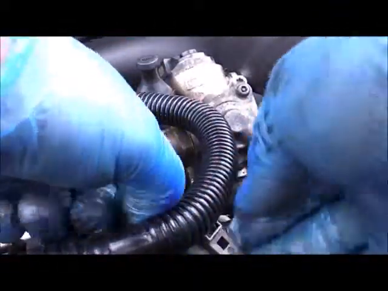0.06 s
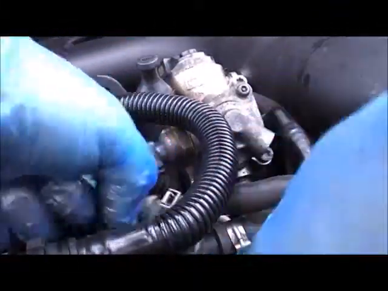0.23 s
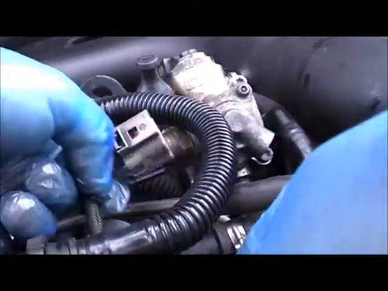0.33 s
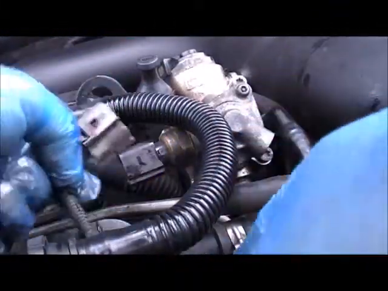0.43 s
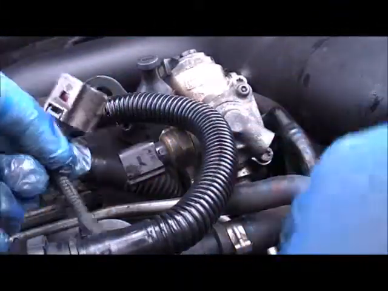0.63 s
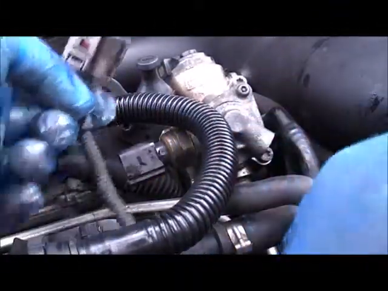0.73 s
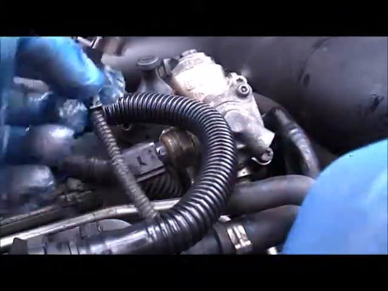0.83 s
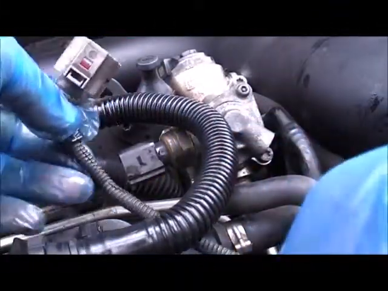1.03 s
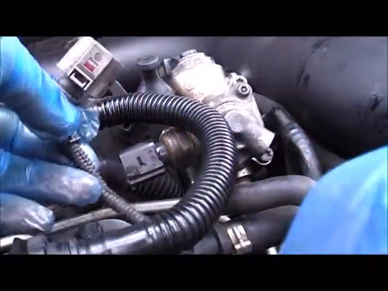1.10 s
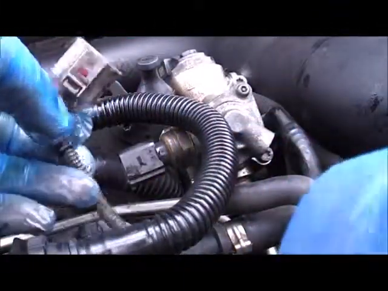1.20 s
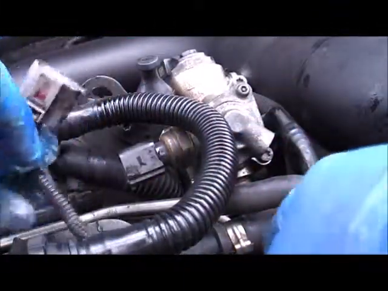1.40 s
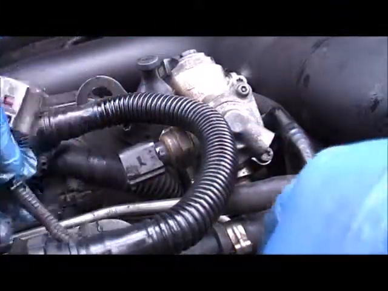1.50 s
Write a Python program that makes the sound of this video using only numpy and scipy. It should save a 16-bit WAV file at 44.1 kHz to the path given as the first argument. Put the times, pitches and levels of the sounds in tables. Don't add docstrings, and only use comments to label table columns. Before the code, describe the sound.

Close, dry glove film hisses and crinkles as hands free a plastic connector: light taps, one strong clattering knock, then a few sharp pops and quieter rustling, with low far traffic behind.

```python
import sys
import numpy as np
from scipy import signal
from scipy.fft import rfft, irfft
from scipy.io import wavfile
from scipy.ndimage import uniform_filter1d

SR = 44100
rng = np.random.default_rng(int(sys.argv[2]) if len(sys.argv) > 2 else 0)


def gain_from_db(level_db):
    decades = np.asarray(level_db, float) / 20
    return 10 ** decades


def output_pcm(signal):
    pcm = np.clip(np.atleast_2d(signal).T, -1, 1) * 32767
    wavfile.write(sys.argv[1], SR, np.round(pcm).astype(np.int16))


N = 68355
MODE_S = 0.08

# start_s, length_s, level_db, whistle_hz, whistle_share_db
GLOVE_STROKES = [(.0, 0.6, -55.5, 6570, -21), (.006, .036, -40, 2930, 0.5),
                 (0.061, 0.052, -56.5, 3580, -20), (0.127, 0.083, -46.5, 6450, -27),
                 (0.21, 0.042, -32, 5460, -8), (0.25, 0.12, -51.5, 2540, -9),
                 (0.373, 0.058, -51.5, 5460, -1), (0.428, 0.055, -51, 3800, -1),
                 (.480, .038, -41, 3800, -2), (.515, .068, -40.5, 6500, -10),
                 (0.626, 0.062, -50.5, 7000, -12), (0.668, .036, -36.5, 4180, -3),
                 (0.72, 0.047, -49, 3740, -12), (0.774, 0.31, -55.5, 6740, -22),
                 (0.813, 0.061, -48, 3660, -15), (0.919, 0.031, -48, 6000, -18),
                 (0.969, 0.011, -43.5, 6500, -20), (1.031, 0.072, -54, 7000, -26),
                 (1.188, 0.5, -57, 6400, -30), (1.22, 0.049, -48, 4500, -20),
                 (1.318, 0.054, -44.5, 3890, -8), (1.399, 0.027, -48.5, 4230, -11),
                 (1.431, 0.064, -64, 4230, -12), (1.531, 0.044, -43.5, 5440, -10)]
# freq_hz, density_db_per_hz
FILM_SPECTRUM = [(880, -62), (1500, -12), (2870, -8.5), (3690, -6), (5020, -5.5), (5950, -3), (7720, -2),
                 (14900, -26), (16300, -67)]
# freq_hz, density_db_per_hz
TRAFFIC_SPECTRUM = [(24, -57), (40, -28), (250, -10.5), (320, -10.5), (1070, 0), (2700, -12.5), (7000, -18),
                    (10700, -28), (16000, -42)]
# time_s, level_db
TRAFFIC_SWELL = [
    (0.0, -47),
    (0.112, -51.5),
    (0.378, -55.5),
    (0.98, -51),
    (1.134, -52.5),
    (1.55, -49.5),
]
# start_s, peak_db, push_s, main_mode_hz
CONNECTOR_KNOCKS = [(.010, -27.5, 0.000065, 1350), (0.0171, -31.5, 0.00007, 1490), (.022, -30, .0001, 2790),
                    (.027, -29.5, 0.000082, 1325), (.038, -28, 0.00037, 886), (.103, -37, 0.00017, 960),
                    (.2188, -10, .0003, 825), (0.2211, -4, .00008, 830), (.2232, -9, 0.000045, 1550),
                    (0.2251, -10.5, 0.00026, 840), (0.2324, -11, 0.000063, 1284),
                    (0.2371, -16.5, 0.000057, 2365), (0.2417, -17, .0001, 2490),
                    (.2455, -17.5, 0.00017, 1344), (0.329, -36.5, .0003, 1350), (.726, -31, 0.00033, 410),
                    (0.7302, -31, .0005, 1065), (.7352, -28, .0005, 1065), (.742, -37, 0.00054, 1070),
                    (.750, -34, 0.00031, 885), (.80, -39, 0.00049, 1210), (1.381, -35, .0004, 1107)]
# freq_hz, level_db, t60_s
CONNECTOR_MODES = [(563, -18, 0.034), (842, -6.5, 0.021), (1057, -8, 0.033), (1203, -8.5, 0.027),
                   (1323, -5, 0.035), (1587, -4, 0.038), (2049, -7.5, 0.037), (2406, -6, 0.037),
                   (2705, -6, 0.028), (3180, -12, .015)]
# start_s, peak_db, ring_hz, ring_t60_s
CREASE_SNAPS = [(.0865, -25.5, 7270, 0.0035), (.200, -41, 6000, .005), (.2212, -4.5, 7240, 0.003),
                (.2232, -7.5, 7130, 0.0066), (.2328, -11.5, 7320, 0.013), (.2372, -7, 6900, 0.0051),
                (.2418, -13, 6500, 0.0064), (.2502, -20.5, 8100, 0.0053), (.2897, -30, 2550, 0.0089),
                (.391, -23.5, 6700, 0.0034), (.5385, -4.5, 5920, 0.0052), (.541, -19, 4560, 0.017),
                (.572, -26, 6400, 0.0056), (.6647, -11, 7150, 0.0078), (.752, -42, 7900, 0.004),
                (.830, -33, 6800, .005), (.948, -5, 6700, .004), (.9495, -18, 7460, 0.0051),
                (.9532, -14, 8400, 0.007), (.955, -11.5, 6820, 0.0043), (.9697, -6, 7340, 0.0028),
                (1.407, -33, 7500, .005)]
# ratio, level_db
PATCH_PARTIALS = [(.42, -18), (.58, -11.5), (.8, -8), (1.0, 5), (1.179, -2.5), (1.48, -5.5), (2.0, -20)]


def colour(x, table):
    freq_hz = np.fft.rfftfreq(N, 1 / SR)
    points = np.array(table)
    db = np.interp(np.log(freq_hz + 1), np.log(points[:, 0]), points[:, 1])
    db = db - 12 * np.clip(np.log2(points[0, 0] / (freq_hz + 1)), 0, 9)
    y = irfft(rfft(x) * gain_from_db(db), N)
    return y / np.std(y)


def band(x, hz, width_hz):
    return signal.lfilter(*signal.iirpeak(min(hz, SR * 0.45), hz / width_hz, fs=SR), x)


def above(x, hz):
    return signal.sosfilt(signal.butter(4, hz, "high", fs=SR, output="sos"), x)


def walk(rate_hz):
    hold = int(SR / rate_hz)
    steps = np.repeat(rng.standard_normal(N // hold + 1), hold)
    return 0.87 * uniform_filter1d(uniform_filter1d(steps, hold), hold)[:N]


def add(out, x, start_s):
    i = max(int(start_s * SR), 0)
    out[i:i + len(x)] += x[:N - i]


def ring(hz, t60_s, phase):
    t = np.arange(int(SR * MODE_S)) / SR
    return np.sin(2 * np.pi * hz * t + phase) * gain_from_db(-60 * t / max(t60_s, 1e-3))


def echo(x, t60_s):
    t = np.arange(SR // 8) / SR
    tail = rng.standard_normal(len(t)) * gain_from_db(-60 * t / t60_s)
    tail = tail / np.sqrt(np.sum(tail ** 2))
    return signal.fftconvolve(x, tail)[:N]


def film_strokes():
    grains_per_s, grain_spread_db, patchy_db, creep_db = 14000, 1.74, 2, -71
    attack_s, release_s, whistle_width, fold_q = 0.0066, 0.022, 0.082, 9
    slips = rng.standard_normal(N) * (rng.random(N) < grains_per_s / SR)
    slips = slips * gain_from_db(grain_spread_db * rng.exponential(size=N))

    folds = np.zeros(N)
    for k, hz in enumerate(1500 * 1.13 ** np.arange(20)):
        folds += (-1) ** k * gain_from_db(1.63 * patchy_db * walk(90)) * band(slips, hz, hz / fold_q)
    film = colour(folds + 0.12 * slips, FILM_SPECTRUM)
    rough = slips / np.std(slips) * gain_from_db(patchy_db * walk(170))

    out = gain_from_db(creep_db + 2 * walk(14.1)) * film
    for start_s, length_s, level_db, hz, share_db in GLOVE_STROKES:
        i = int(start_s * SR)
        here = slice(i, min(i + int((length_s + release_s) * SR), N))
        t = np.arange(here.stop - i) / SR
        env = np.minimum(t / attack_s, (length_s - t) / release_s + 0.56)
        env = np.clip(env, 0, 1) ** 1.27
        width_hz = hz * whistle_width
        whistle = band(band(rough[here], hz, width_hz), hz, 2 * width_hz)
        whistle = whistle / np.std(whistle)
        add(out, gain_from_db(level_db) * env * (film[here] + gain_from_db(share_db) * whistle), start_s)
    return out


def far_traffic():
    level_db, swell_db, flicker_db, side_db = 2.5, 0.22, 2.5, -9.5
    course_db = np.interp(np.arange(N) / SR, *np.array(TRAFFIC_SWELL).T)
    swell = gain_from_db(swell_db * walk(2) + level_db + course_db)

    def hum():
        out = np.zeros(N)
        for hz in 50 * 1.9 ** np.arange(10):
            out += gain_from_db(flicker_db * walk(14.48)) * band(rng.standard_normal(N), hz, hz / 2)
        return colour(out, TRAFFIC_SPECTRUM) * swell

    return hum(), gain_from_db(side_db) * hum()


def connector_knocks():
    scatter_db, main_db, main_t60_s, low_cut_hz = 2.5, 3, 0.03, 588
    thump_db, thump_s, thump_at_s = -33.5, 0.0023, 0.221
    out = np.zeros(N)
    t = np.arange(200) / SR
    chance = rng.standard_normal((len(CONNECTOR_KNOCKS), 3, len(CONNECTOR_MODES)))
    for (start_s, peak_db, push_s, main_hz), draws in zip(CONNECTOR_KNOCKS, chance):
        x = gain_from_db(main_db) * ring(main_hz, main_t60_s, 0)
        for (hz, db, t60_s), level, detune, sign in zip(CONNECTOR_MODES, *draws):
            gain = np.sign(sign) * gain_from_db(db + scatter_db * level)
            x += gain * ring(hz * (1 + 0.019 * detune), t60_s, 0)
        push = np.exp(-2 * t / max(push_s, 2e-5))
        x = np.convolve(x, push)
        add(out, gain_from_db(peak_db) * x / np.max(np.abs(x)), start_s)
    out = above(out, low_cut_hz)
    add(out, gain_from_db(thump_db) * np.hanning(int(thump_s * SR)), thump_at_s)
    return out


def crease_snaps():
    crack_db, crack_s, tail_db, tail_t60_s = -13, 0.00022, -18.5, 0.028
    rise_s, low_cut_hz = 0.00013, 2440
    out = np.zeros(N)
    t = np.arange(int(SR * MODE_S)) / SR
    hiss = colour(rng.standard_normal(N), FILM_SPECTRUM)
    rustle_env = gain_from_db(crack_db) * np.exp(-t / crack_s) + gain_from_db(tail_db - 60 * t / tail_t60_s)
    chance = rng.standard_normal((len(CREASE_SNAPS), 2, len(PATCH_PARTIALS)))
    for (start_s, peak_db, ring_hz, t60_s), draws in zip(CREASE_SNAPS, chance):
        x = np.zeros(len(t))
        for (ratio, db), scatter, phase in zip(PATCH_PARTIALS, *draws):
            detune = 1 + 0.035 * scatter * (ratio != 1)
            x += gain_from_db(db + scatter) * ring(ring_hz * ratio * detune, t60_s, 2 * phase)
        x = x * (1 - np.exp(-t / rise_s))
        rustle = hiss[int(start_s * SR):][:len(t)] * rustle_env
        add(out, gain_from_db(peak_db) * (x / np.max(np.abs(x)) + rustle), start_s)
    return above(out, low_cut_hz)


def port_difference(high):
    port_hz, port_width_hz, port_db, port_t60_s = 8740, 1500, 2.5, 0.0033
    room_db, room_hz, shifts_per_s = -5, 9500, 70
    turn = 2 * walk(shifts_per_s)
    shifting = np.cos(turn) * echo(high, port_t60_s) + np.sin(turn) * echo(high, port_t60_s)
    port = band(band(shifting, port_hz, port_width_hz), port_hz, 2 * port_width_hz)
    return gain_from_db(port_db) * port + gain_from_db(room_db) * above(shifting, room_hz)


def scene():
    bay_db, bay_t60_s = -17, 0.04
    knock_lean_db, film_lean_db, traffic_lean_db = 4.5, 1.1, 3
    high = film_strokes()
    far_mid, far_side = far_traffic()
    low = connector_knocks()
    high = high + crease_snaps()
    near = low + high

    mid = near + gain_from_db(bay_db) * echo(near, bay_t60_s) + far_mid
    side = port_difference(high) + far_side
    side += np.tanh(knock_lean_db / 16.7) * low
    side += np.tanh(film_lean_db / 17.4) * high
    side += np.tanh(traffic_lean_db / 15.4) * far_mid
    return np.array([mid + side, mid - side])


def band_limit(x):
    return signal.sosfilt(signal.butter(12, 16480, fs=SR, output="sos"), x)


def record(dry):
    x = signal.sosfilt(signal.ellip(8, 0.2, 60, 16300, fs=SR, output="sos"), dry)
    return band_limit(np.clip(x, -1, 1))


dry = scene()
out = record(dry)
output_pcm(out)
```